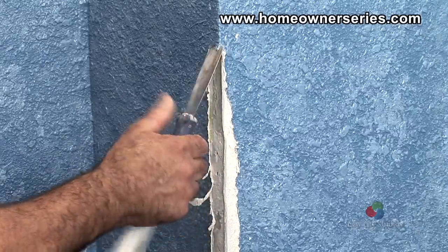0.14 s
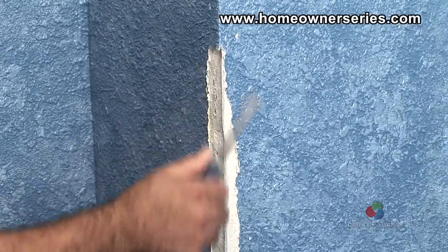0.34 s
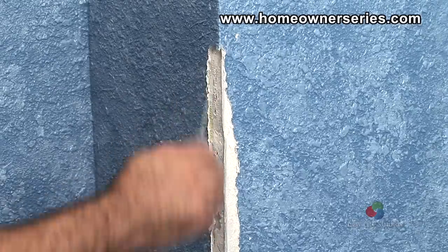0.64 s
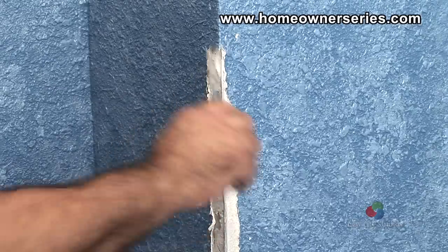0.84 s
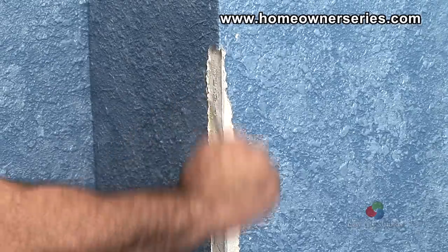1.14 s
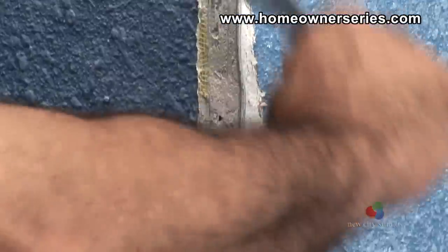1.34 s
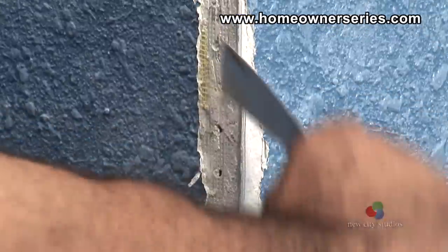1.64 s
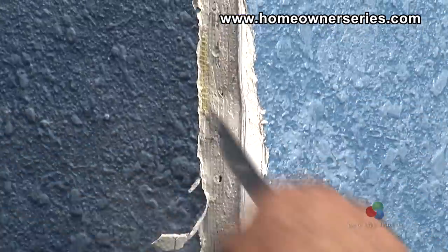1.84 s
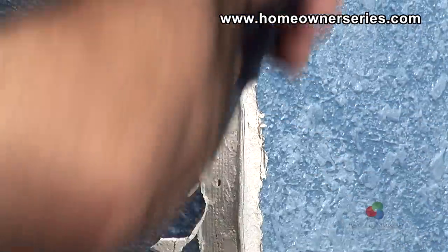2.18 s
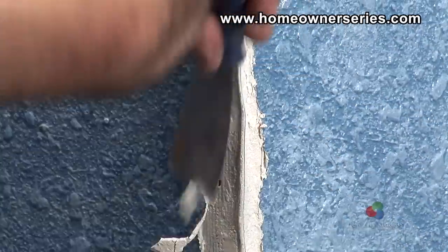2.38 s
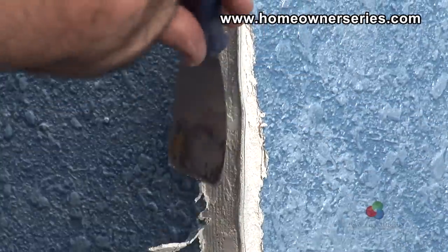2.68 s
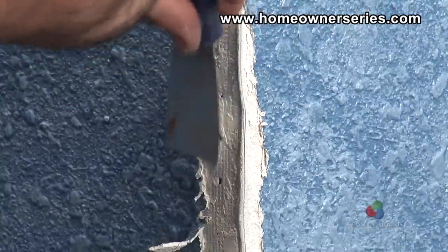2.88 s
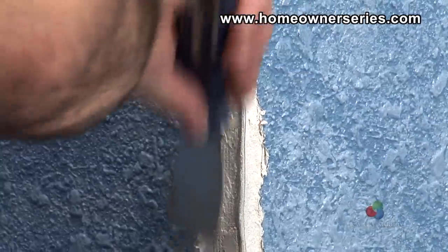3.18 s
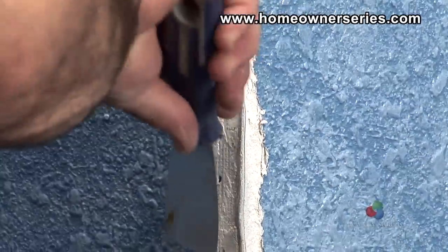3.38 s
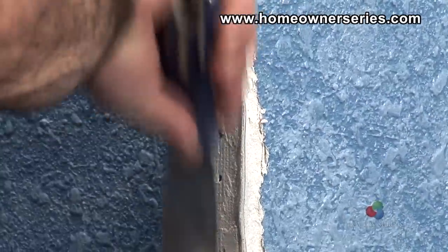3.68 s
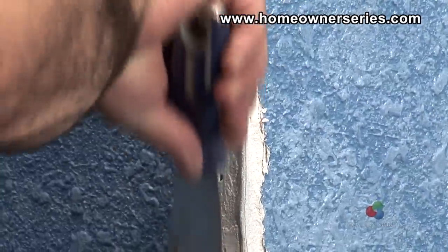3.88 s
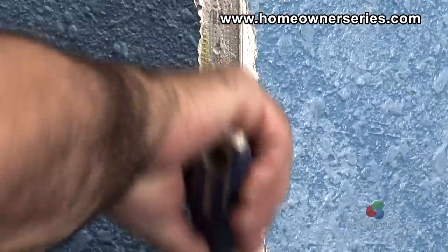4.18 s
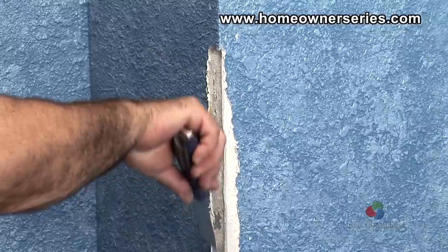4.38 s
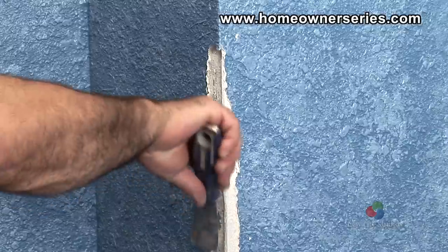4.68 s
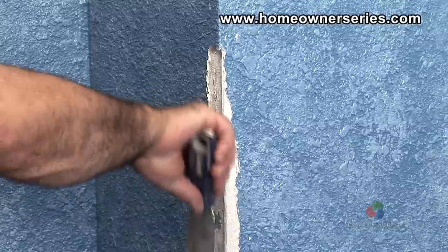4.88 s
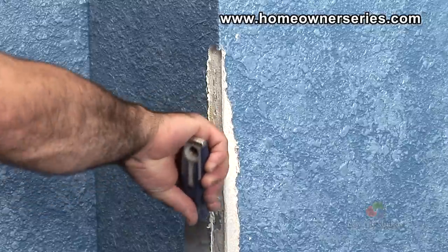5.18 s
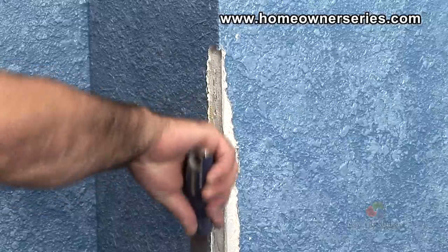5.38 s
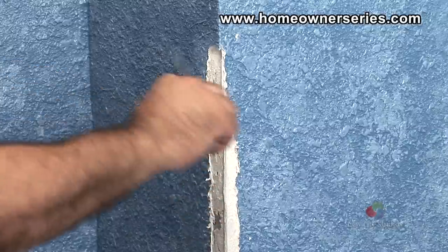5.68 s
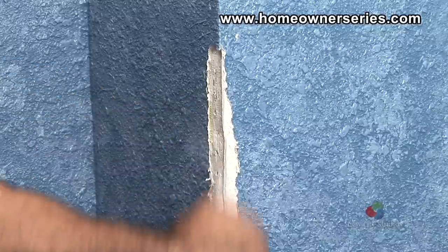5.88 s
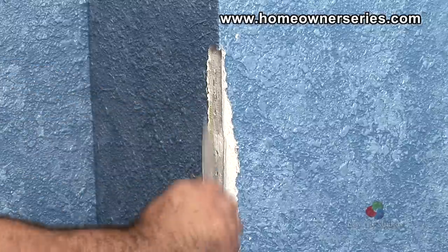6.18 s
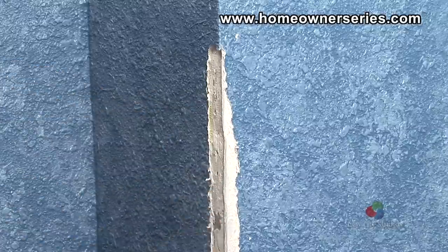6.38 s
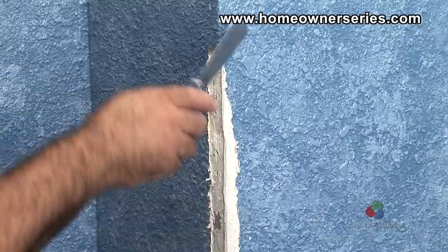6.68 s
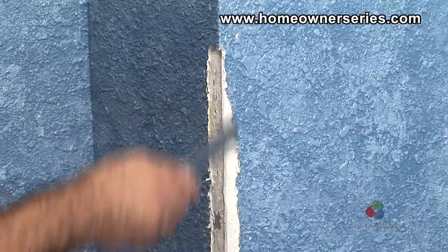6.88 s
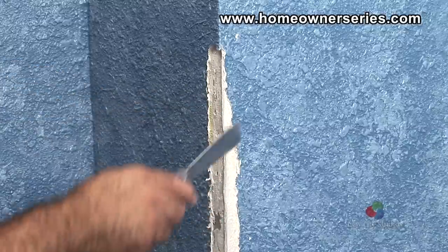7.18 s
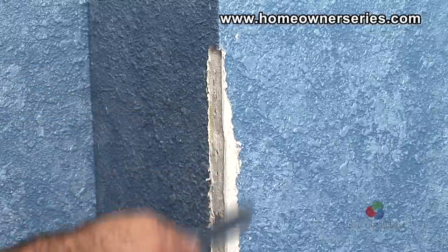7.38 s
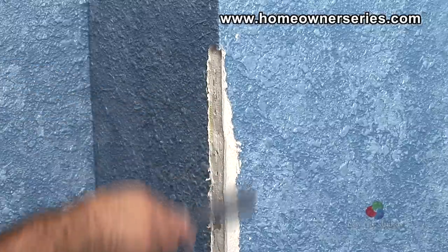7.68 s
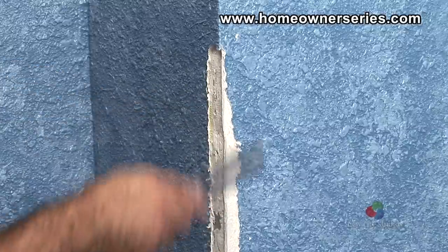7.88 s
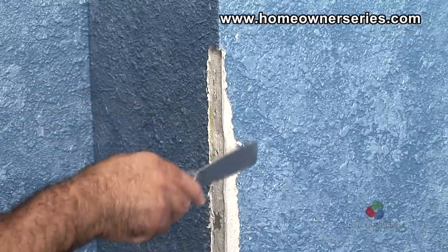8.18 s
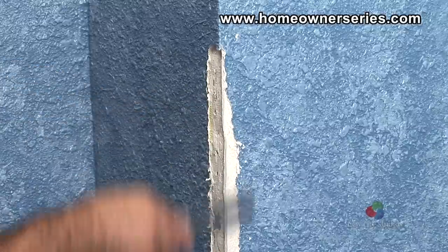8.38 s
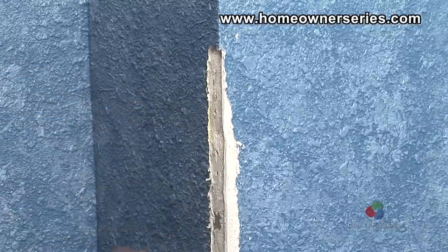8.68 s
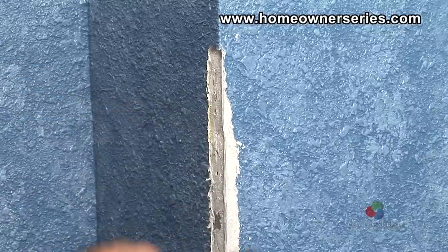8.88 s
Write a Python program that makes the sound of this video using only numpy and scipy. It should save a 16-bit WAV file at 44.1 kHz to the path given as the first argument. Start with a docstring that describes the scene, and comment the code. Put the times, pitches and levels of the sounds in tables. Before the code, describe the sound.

A steel scraping knife rasps, taps and pries along a stripped drywall corner in irregular bursts, with gritty crunches, hollow wall thuds and faint blade rings in a bare room.

```python
"""In a bare room, a steel taping knife rasps, taps and pries along a stripped drywall corner.
One rough stick-slip force rings the panel, board face, blade and steel, and crushes plaster grit.
Taps jolt the same bodies and carry short knocks; shoves thud the hollow wall, and freed steel rings.
Sparse decaying echoes let the room ring on, over a faint floor of rumble, hum and hiss."""
import sys
import numpy as np
from scipy import signal
from scipy.fft import rfft, irfft
from scipy.io import wavfile
from scipy.ndimage import uniform_filter1d

SR = 44100
rng = np.random.default_rng(int(sys.argv[2]) if len(sys.argv) > 2 else 0)


def wrap_up_sound(samples):
    """Save the sound to the file named by the first command line argument, as 16-bit audio."""
    columns = np.atleast_2d(samples).T
    # keep every value between -1 and 1, then stretch to whole-number steps
    tamed = np.clip(columns, -1, 1)
    steps = np.round(tamed * 32767).astype(np.int16)
    wavfile.write(sys.argv[1], SR, steps)


N = 398647


def gain_of(db):
    """Decibels to an amplitude factor."""
    return 10 ** (np.asarray(db) / 20)


def evened(x):
    """Scales a signal to an RMS of 1."""
    return x / np.sqrt(np.mean(x ** 2) + 1e-20)


def read(points, at):
    """Reads a spectral curve between its points, along log frequency."""
    x, value = np.transpose(points)
    return np.interp(np.log(at + 1), np.log(x + 1), value)


def curve(rows):
    """Straight-line automation through (time, value) rows, one value per sample."""
    s, value = np.transpose(rows)
    return np.interp(np.arange(N) / SR, s, value)


# Room tone and hiss: (frequency [Hz], relative density [dB per Hz])
TONE_SPECTRUM = [(32, -37.5), (55, -15.5), (93, -13), (127, 0), (150, -12), (247, -15.5), (266, -20),
                 (584, -19), (919, -24.5), (15000, -34), (16500, -50)]
# Left-right likeness of that tone: (frequency [Hz], correlation [0 to 1])
TONE_LIKENESS = [(60, 0.63), (380, 0.23), (2380, 0.09), (15000, 0.67)]
# Low rumble in the building: (time [s], level [dB])
RUMBLE_LEVEL = [(0, -48), (.68, -79), (1.31, -56), (2.16, -72.5), (2.39, -47), (2.82, -60), (3.83, -47.5),
                (4.28, -65.5), (5.11, -46.5), (5.61, -68.5), (6.8, -66), (6.97, -50.5), (7.93, -63),
                (8.06, -53.5), (9.04, -49)]
# Mains hum: (time [s], level [dB])
HUM_LEVEL = [(0, -71), (.5, -72.5), (2.3, -69.5), (3., -84.5), (9.04, -81)]
TONE_DB, HUM_HZ = -71, 120


def floor():
    """Shaped noise makes room tone and hiss; low noise makes a lumpy rumble, and a sine the hum."""
    hz = np.fft.rfftfreq(N, 1 / SR)
    a, b, low = rfft(rng.standard_normal((3, N)))
    same = np.clip(read(TONE_LIKENESS, hz), 0, 1)
    left_right = np.array([a, same * a + np.sqrt(1 - same ** 2) * b])
    tone = irfft(left_right * gain_of(read(TONE_SPECTRUM, hz)), N)
    # a hump at 35 Hz over a shelf that falls away upward
    rumble_shape = np.exp(-((hz - 35.) / 10.) ** 2) + 0.29 / (1 + (hz / 143.0) ** 2)
    rumble = irfft(np.array([0.22 * low + a, 0.085 * low + b]) * rumble_shape, N)
    hum = np.sqrt(2) * np.sin(2 * np.pi * HUM_HZ * np.arange(N) / SR)
    out = gain_of(TONE_DB) * evened(tone)
    out = out + gain_of(curve(RUMBLE_LEVEL)) * evened(rumble)
    return out + gain_of(curve(HUM_LEVEL)) * hum


def slips(per_s, spread_db, smooth):
    """Uneven stick-slip: clumped jolts, a few large, over a fine rub."""
    clumps = gain_of(2.59 * evened(uniform_filter1d(rng.standard_normal(N), 350)))
    size = gain_of(spread_db * np.minimum(rng.exponential(1, N), 4)) * rng.choice([-1., 1.], N)
    jolts = size * (rng.random(N) < per_s / SR)
    return evened(clumps * (evened(jolts) + smooth * rng.standard_normal(N)))


# Scraping strokes: (start time [s], swell [s], fade [s], peak grit drive [dB],
# entry level relative to that peak [dB], blade rasp to grit [dB], board face to grit [dB])
STROKES = [(0.0, 0.14, 0.016, -71.5, 2.5, 0.5, -1.5), (.22, 0.084, 0.033, -69.5, 9, 0, -9.5),
           (0.876, 0.088, 0.01, -60.5, -4, 5.5, 7.5), (0.967, 0.052, 0.028, -48, -5, 11, -2.5),
           (1.04, 0.032, 0.035, -50, 4, 4, -27), (1.104, 0.032, 0.016, -49.5, -22, 3, -6.5),
           (1.305, 0.043, 0.031, -43, -32, 3.5, 4), (1.374, 0.025, 0.036, -44, -4, 6, 1.5),
           (1.426, 0.029, 0.034, -42.5, -8, 4, -14.5), (1.5, 0.055, 0.062, -44, -46, 2.5, -23),
           (1.638, 0.005, 0.11, -60.5, 5, 6.5, -1), (1.677, 0.024, 0.052, -58, 7, 7, -10),
           (1.72, 0.025, 0.026, -49.5, -13, 2.5, -12), (2.217, 0.078, 0.18, -65.5, -13, 3.5, -5),
           (2.42, 0.018, 0.062, -54, -15, -3, -37), (2.49, 0.0032, 0.16, -64, -9, 0, -26),
           (2.619, 0.023, 0.06, -63, -30, 4, 6), (2.801, 0.056, 0.016, -62, -7, -1, -10),
           (2.884, 0.093, 0.052, -54, -7, 0.5, -2.5), (3.052, 0.039, .1, -60, 3, -6.5, -12),
           (3.15, 0.067, 0.025, -50, -19, -2.5, -2), (3.344, 0.011, 0.032, -59.5, -9, -7, -10),
           (3.419, 0.016, 0.027, -60.5, -8, 1, -5), (3.535, 0.067, 0.018, -60.5, -13, -1, -8),
           (3.646, 0.058, 0.14, -50, -14.5, -1, -5), (3.829, 0.041, 0.06, -59.5, -13, -1.5, -8),
           (3.948, 0.066, 0.059, -44, -19, -1, -13.5), (4.079, 0.1, 0.047, -54.5, -13.5, 1, -21),
           (4.221, 0.0078, 0.03, -50.5, -8, -4.5, -5), (4.334, 0.11, 0.014, -70, -2, -9, -7),
           (4.441, 0.091, 0.029, -53, -33, -1, -3), (4.65, 0.052, 0.22, -70, -5.5, -4, -12),
           (4.767, 0.031, 0.047, -54.5, -8, 0, 2), (4.918, 0.023, 0.066, -60.5, -5, -8.5, -29),
           (4.986, 0.021, 0.082, -53, -17, 2.5, 0), (5.353, 0.0058, 0.053, -50.5, -19, -8.5, -21.5),
           (5.76, 0.073, 0.061, -45.5, -29, 6, 7.5), (5.858, 0.045, 0.088, -41, -7.5, 0.5, -22),
           (6.23, 0.086, 0.048, -48, -1.5, -3, -3), (6.852, 0.11, 0.02, -47.5, -6.5, 3, 7),
           (7.231, 0.069, 0.072, -43, -12, 4, 6.5), (7.606, 0.18, 0.05, -60, 5, -4, -11),
           (7.837, 0.0033, 0.025, -60, -6, -5, -11), (8.006, 0.12, 0.013, -71, -11, 10, 17),
           (8.127, 0.077, .012, -83, -7, 12, 20), (8.329, 0.15, 0.0079, -49, -14, -3, -7),
           (8.648, 0.033, 0.015, -59, 2, 4, -5), (8.68, 0.027, 0.033, -48, 1, 1.5, 7),
           (8.898, 0.025, .012, -52.5, -1, -1, 7.5), (8.931, 0.0099, 0.058, -42.5, -8.5, 6.5, 8)]
LAND_S, LIFT_S = 0.0017, .007  # the edge meets the plaster and leaves it
FADE_DB, FADE_BEND = -23.5, 1.265  # how far a stroke sinks before the edge lifts, and how late


def strokes():
    """Force envelopes on board, blade and edge: each stroke lands, swells, fades and lifts."""
    gains = np.zeros((3, N + SR))
    for start, swell, fade, db, entry_db, blade_db, board_db in STROKES:
        t = np.arange(0, swell + fade + LIFT_S, 1 / SR)
        swell_db = entry_db * (1 - t / swell)
        sink_db = FADE_DB * (abs(t - swell) / fade) ** FADE_BEND
        shape_db = np.where(t < swell, swell_db, sink_db)
        touch = np.clip(np.minimum(t / LAND_S, (t[-1] - t) / LIFT_S), 0, 1)
        body_db = np.array([[board_db], [blade_db], [0]])
        gains[:, round(start * SR):][:, :len(t)] += touch * gain_of(db + shape_db + body_db)
    return gains[:, :N]


# A looser grip lets the steel sing in the stroke: (time [s], level relative to the grit [dB])
LOOSE = [(0, -17), (7.5, -8), (7.62, -3.5), (9.04, -1)]


def contact_gains(weight):
    """Stick-slip force reaching panel, board, blade, edge and loose steel."""
    board, blade, edge = strokes() + skids()
    panel = gain_of(-16.5) * weight + gain_of(-8.0) * board  # shaken by weight and by grip
    return np.array([panel, board, blade, edge, gain_of(curve(LOOSE)) * edge])


def ring(modes, shift=0.064, uneven_db=2.0, turn=0.95):
    """Response to a blow at one spot, heard at two points: each spot stirs the modes unevenly. Energy 1."""
    t = np.arange(SR // 3) / SR
    out = np.zeros((2, len(t)))
    for hz, db, t60 in modes:
        decay_db = db - 60 * t / t60 + uneven_db * rng.standard_normal((2, 1))
        phase = 2 * np.pi * hz * rng.normal(1, shift) * t + rng.normal(0, turn, (2, 1))
        out += gain_of(decay_db) / np.sqrt(t60) * np.sin(phase)
    out = out * (1 - np.exp(-t / 0.00044))
    return out / np.linalg.norm(out, axis=1, keepdims=True)


def crack(spectrum):
    """Shortest causal (minimum-phase) pulse with this spectrum. Energy 1."""
    level_db = read(spectrum, abs(np.fft.fftfreq(4096, 1 / SR)))
    log_gain = np.log(gain_of(np.maximum(level_db, -80)))
    pulse = np.fft.ifft(np.exp(np.conj(signal.hilbert(log_gain)))).real[:2048]
    return pulse / np.linalg.norm(pulse)


# Resonant modes of the panel, the board face, the pressed blade and the free steel, in that order:
# (nominal frequency [Hz], relative level [dB], t60 [s])
PANEL = [(279.4, -10.5, 0.031), (394, -1, 0.24), (463, -0.5, 0.061), (544, 0, 0.046), (652, -1.5, 0.051)]
BOARD = [(752, 1, 0.012), (1035, -4, 0.011), (1052, -9.5, 0.04), (1203, 3, 0.033), (1470, 1.5, 0.0016),
         (1788, -0.5, 0.013), (1387, 4, 0.011)]
BLADE = [(1860, -14.5, 0.01), (2260, 7, 0.023), (2395, 5, 0.009), (2638, 3, 0.01), (2860, 9, 0.013),
         (3300, -2.5, 0.012)]
STEEL = [(2027., -4, .1), (2988., 4, .5), (3350., -4, .09), (4221., -3, .1), (5281., 0, .2),
         (5650., -4, .12), (6600., -6, .1), (7400., -5, .07), (8737., -1, .25), (9900., -8, .08)]
# Crushed plaster: (frequency [Hz], relative density [dB per Hz])
GRIT = [(1940, -64.5), (3300, -3), (4900, 4), (6020, 2.5), (7340, 2.5), (10600, -6.5), (15200, -7.5),
        (16000, -55)]


def bodies():
    """Responses of panel, board face, pressed blade, grit and free steel, as stirred from one spot."""
    scatter = rng.standard_normal((2, 300)) * .18 * np.exp(-np.arange(300) / 40)  # off the corner's edges
    scatter[:, 0] = 1
    grit = signal.fftconvolve(crack(GRIT)[None], scatter, axes=1)
    grit /= np.linalg.norm(grit, axis=1, keepdims=True)
    steel = ring(STEEL, .001, 2.)
    return [ring(PANEL), ring(BOARD), ring(BLADE), grit, steel]


# Where the bent blade rings most: (time [s], frequency [Hz])
FLEX = [(0.9, 2460), (1.0, 3000), (1.05, 2540), (1.09, 2870), (1.35, 2700), (1.42, 2760), (1.47, 2500),
        (1.65, 2285), (1.75, 2670), (2.3, 2600), (2.47, 2280), (3.75, 2800), (4.0, 2700), (4.06, 2320),
        (5.84, 2670), (5.95, 2250), (6.4, 2350), (6.9, 2834), (9.04, 3230)]
HIT_HOLD_S = 0.017


def blade_pitch():
    """The bend of the blade sets the pitch; each hit pulls it to its own for a moment."""
    hz = curve(FLEX)
    for s, *_, hit_hz in HITS:
        hz[round(s * SR):][:round(HIT_HOLD_S * SR)] = hit_hz
    return hz


BLADE_GLIDE, STEEL_GLIDE = .025, .06  # RMS pitch drift under the changing grip, as a fraction
GLIDE_S, SING_T60 = .12, .07  # smoothing of the drift [s], t60 of damped steel [s]
SWAP_DB = 5  # the grip frees now one mode, now another
FOCUS_DB_PER_OCTAVE = 28.5  # blade modes away from its pitch are stirred less


def gliding(drive, modes, glide, centre_hz=None):
    """Modes whose pitch and strength drift, heard at two points with drifting phase. Energy 1 per blow."""
    at, step = np.arange(N), 500
    noise = rng.standard_normal((len(modes), 3, N // step + 2))
    smooth = uniform_filter1d(noise, round(GLIDE_S * SR / step), axis=2)
    slow = [[np.interp(at / step, np.arange(len(v)), evened(v)) for v in mode] for mode in smooth]
    share = []
    for (hz, db, _), (_, _, swap) in zip(modes, slow):
        if centre_hz is None:
            change_db = SWAP_DB * swap
        else:
            change_db = -FOCUS_DB_PER_OCTAVE * abs(np.log2(hz / centre_hz))
        share.append(gain_of(db + change_db))
    share = np.array(share)
    share /= np.linalg.norm(share, axis=0)
    out = np.zeros((2, N))
    for (hz, _, t60), part, (drift, lead, _) in zip(modes, share, slow):
        turn = np.exp(2j * np.pi * np.cumsum(hz * (1 + glide * drift)) / SR)
        r = gain_of(-60 / t60 / SR)  # decay per sample
        envelope = signal.lfilter([1], [1, -r], part * drive / turn)
        z = np.sqrt(2 * (1 - r * r)) * turn * envelope
        out += [z.imag, (z * np.exp(0.8j * lead)).imag]
    return out


# Low modes of the hollow wall: (nominal frequency [Hz], relative level [dB], t60 [s])
WALL = [(86, 0, .1), (95, -1.5, 0.1), (114, -6, 0.074), (160.4, -12, 0.042), (176.4, -4, 0.1),
        (205.3, -5.5, 0.19)]
DRAG_DB = -2.5  # relative to the board face


def dragged_wall(board):
    """The dragged edge keeps the wall rumbling through its low modes."""
    response = ring(WALL, 0.0082, 0.93, 0.85)
    return gain_of(DRAG_DB) * signal.oaconvolve(board[None], response, axes=1)[:, :N]


# Taps, catches and snapping flakes: (time [s], drive level [dB],
# board face relative to it [dB], grit relative to it [dB], pitch of the knock [Hz])
HITS = [(0.2185, -44, -11, -2, 2200), (0.2244, -43, -6, 6, 2420), (0.2927, -42.5, -23, 2, 2070),
        (0.33, -53, -18, 16, 4500), (0.361, -49.5, -29, 17.5, 4100), (0.391, -52.5, -22, 15.5, 3820),
        (0.5068, -64, -18, 21.5, 4030), (0.558, -20, -3.5, -13, 1200), (0.5619, -12, -2, -11, 1430),
        (0.578, -22, -8, -9.5, 1860), (0.8635, -36.5, 0, -0.5, 2680), (0.9886, -31.5, -3, 7, 3250),
        (1.2907, -31, -3.5, -5.5, 2640), (1.3962, -17, -22, -6, 1470), (1.6396, -37, -10, -16, 2240),
        (2.223, -42.5, -29, -26, 2900), (2.6551, -28, -1, -13, 2280), (2.8736, -42.5, -12, 10.5, 3820),
        (3.436, -34.5, -6, -1.5, 1080), (3.5257, -37, -23, 18, 2590), (3.5717, -33, -18, -2.5, 2900),
        (3.6403, -35.5, -0.5, -12, 1070), (3.6987, -43, 4.5, -9, 2290), (4.297, -41, -4.5, 11, 2040),
        (4.4584, -50, -6, -5, 2420), (5.3177, -53, -17.5, 15.5, 3880), (5.3589, -44.5, -19.5, -4, 2940),
        (5.485, -57, -12.5, 9, 4260), (5.7552, -41.5, 2, -3.5, 2620), (5.7892, -27, -1, -10, 2100),
        (5.885, -14, -30, -24, 2380), (5.903, -25, -17, -4, 2400), (5.9187, -23, -32, -15, 2860),
        (5.9363, -25.5, -27, 0, 2560), (6.2298, -22, -7.5, -15, 2150), (6.855, -37.5, -0.5, 3.5, 2735),
        (7.181, -34, -6.5, 1.5, 2953), (7.4903, -47, 5, 3, 1240), (7.6017, -30, 3, -3.5, 1480),
        (7.6172, -29, -9, 2.5, 3200), (7.7062, -45.5, -13, 18, 4000), (7.775, -29, -9.5, -3, 1220),
        (7.839, -46.5, -30, 15, 4000), (7.9966, -31, -18, 0, 1520), (8.035, -38.5, -5, 1, 2720),
        (8.0471, -34.5, 1.5, -13, 2750), (8.101, -28.5, 3.5, 6, 2620), (8.1856, -38, -13, -4, 2090),
        (8.206, -51.5, -9, 19.5, 3020), (8.266, -67, -18, 18, 4000), (8.325, -22, -32, -3, 1120),
        (8.4742, -32, -0.5, -6, 1210), (8.587, -51.5, -17, 9.5, 1250), (8.6271, -30.5, -12, 8.5, 3240),
        (8.7208, -23, 0.5, -5, 2700), (8.8837, -22, -16, -4.5, 1050), (8.993, -27, -4.5, -4, 3000)]
BLADE_HZ, BLADE_DB_PER_OCTAVE = 2000, 10  # a hit pitched below the blade stirs it less


def blows(rings):
    """Each hit is a jolt with a few quick rebounds, scaled by the peak of each body's response."""
    drive, t = np.zeros((5, N + 512)), np.arange(512)
    shape = (len(HITS), 512)
    chatter = rng.standard_normal(shape) * (rng.random(shape) < .06) * 0.22 * np.exp(-t / 150.0)
    chatter[:, 0] = 1
    peaks = np.array([abs(r).max() for r in rings])
    for (s, db, board_db, grit_db, hz), jolt in zip(HITS, chatter):
        blade_db = BLADE_DB_PER_OCTAVE * min(np.log2(hz / BLADE_HZ), 0) - 6.0
        size = gain_of(db + np.array([board_db - 15.0, board_db, blade_db, grit_db])) / peaks[:4]
        drive[:4, round(s * SR):][:, :512] += size[:, None] * jolt
    return drive[:, :N]


def knocks(t60):
    """The patch under the edge gives each hit a brief pitch of its own, a decaying sine."""
    out, t = np.zeros(N + 2000), np.arange(2000) / SR
    for s, db, *_, hz in HITS:
        decay = gain_of(db - 4.0 - 60 * t / t60) * (1 - np.exp(-t / 0.00032))
        out[round(s * SR):][:2000] += decay * np.sin(2 * np.pi * hz * t)
    return out[:N]


SCUFF_DB, SCUFF_DB_PER_S = -24.5, -1500  # start relative to the hit's grit, and decay
SCUFF_BLADE_DB, SCUFF_BOARD_DB = -3.5, -7  # relative to the scuffed grit


def skids():
    """Force envelopes on board, blade and edge: the edge skids briefly after each hit."""
    gains = np.zeros((3, N + SR))
    t = np.arange(SR // 20) / SR
    body_db = np.array([[SCUFF_BOARD_DB], [SCUFF_BLADE_DB], [0]])
    skid = np.minimum(t / LAND_S, 1) * gain_of(SCUFF_DB + SCUFF_DB_PER_S * t + body_db)
    for s, db, _, grit_db, _ in HITS:
        gains[:, round(s * SR):][:, :len(t)] += gain_of(db + grit_db) * skid
    return gains[:, :N]


# The blade springs clear of the wall and rings: (time [s], drive level [dB])
RINGS = [(0.294, -52), (1.144, -59), (3.353, -55), (5.398, -52.5), (5.959, -45), (7.181, -47), (7.619, -55),
         (7.788, -57), (8.104, -59), (8.184, -47), (8.63, -39), (8.995, -52)]


def springs(steel):
    """One impulse into the free steel each time the blade springs clear."""
    drive = np.zeros(N)
    for s, db in RINGS:
        drive[round(s * SR)] += gain_of(db) / abs(steel).max()
    return drive


# Weight thrown into the hollow wall: (time [s], drive level [dB])
PUSH = [(0.569, -58), (0.861, -38), (0.998, -39.5), (1.285, -32.5), (1.359, -41), (1.439, -41),
        (1.631, -33.5), (2.312, -37.5), (2.4, -45), (2.649, -29), (2.928, -37), (2.978, -38), (3.206, -25),
        (3.432, -26.5), (3.65, -36), (3.695, -23.5), (3.759, -54), (3.942, -39.5), (4.486, -41.5),
        (4.53, -33), (4.794, -32), (4.998, -34.5), (5.025, -27.5), (5.091, -55), (5.353, -46.5),
        (5.756, -31.5), (5.787, -33), (5.881, -33.5), (6.228, -29.5), (6.871, -49), (6.908, -31),
        (7.186, -42), (7.266, -49), (7.299, -50), (7.601, -32.5), (7.999, -39.5), (8.093, -28.5),
        (8.173, -43.5), (8.336, -44), (8.451, -45.5), (8.622, -42), (8.689, -46), (8.885, -59),
        (8.945, -40), (8.999, -34.5)]
# Tighter or boomier wall where the weight lands: (time [s], mode tilt [dB per octave])
WALL_TILT = [(0, 5), (2.1, -2.5), (2.4, -4.5), (5.4, -2.5), (5.7, 11.5), (6.4, -6), (6.8, 5), (9.04, -11)]


def thuds(rise_s=0.0076, fall_s=0.031):
    """Each shove is a short uneven force on the wall's low modes; also returns how the weight comes and goes."""
    t = np.arange(SR // 6) / SR
    shove = (1 - np.exp(-t / rise_s)) * np.exp(-t / fall_s)
    out, weight = np.zeros((2, N + SR)), np.zeros(N + SR)
    tilt = curve(WALL_TILT)
    for s, db in PUSH:
        at = round(s * SR)
        modes = [(hz, mode_db + tilt[at] * np.log2(hz), t60) for hz, mode_db, t60 in WALL]
        push = shove * rng.normal(0, 1, (1, len(t)))
        push[0, round(rise_s * SR)] += 25.  # a strong jolt stands out of the push
        thud = signal.fftconvolve(ring(modes, 0.036, 2.6, 0.68), push, axes=1)
        out[:, at:][:, :thud.shape[1]] += gain_of(db) * thud / abs(thud.mean(0)).max()
        weight[at:][:len(t)] += gain_of(db) * shove
    return out[:, :N], weight[:N]


def placed(x, lag_ms, pan_db):
    """Delays the right channel (negative: advances it) and tilts the balance."""
    late = np.clip(np.arange(N) - np.round(lag_ms * SR / 1000).astype(int), 0, N - 1)
    return np.array([x[0] * gain_of(pan_db / 2), x[1, late] / gain_of(pan_db / 2)])


# Where the knife works: (start time [s], lag of the right channel [ms], left louder by [dB])
PLACES = [(0, 0.53, 3.5), (.52, 0.57, 11.5), (2.098, 0.0042, 11), (5.6, .4, 9.5), (6.701, -0.77, 0.5)]
# The wall radiates as a whole: (lag of the right channel [ms], left louder by [dB])
WALL_PLACE = (0.5, 0.69)
SPOTS, SPOT_SAMPLES = 6, 1500  # a contact spot is drawn anew every 34 ms
WALL_CUT_HZ = 85  # the wall cannot radiate below its lowest modes
WALL_WET_DB = -1  # the wall's lows feed the room less than the edge does


def knife():
    """One rough contact force and the blows drive all bodies, from a contact spot that keeps moving."""
    wall, weight = thuds()
    rough = slips(per_s=2500., spread_db=3.5, smooth=0.55)
    panel, board, blade, edge, loose = rough * contact_gains(weight)
    wall = wall + dragged_wall(board)
    wall = signal.sosfilt(signal.butter(2, WALL_CUT_HZ, "high", fs=SR, output="sos"), wall)
    force = np.array([panel, board, blade, edge, np.zeros(N)])
    spot = np.repeat(rng.integers(0, SPOTS, N // SPOT_SAMPLES + 1), SPOT_SAMPLES)[:N]
    near, on_blade = knocks(t60=.007), np.zeros(N)
    for k in range(SPOTS):
        rings = bodies()
        drive = force + blows(rings)
        drive[4] += springs(rings[4])
        drive *= spot == k
        on_blade += drive[2]
        for i in (0, 1, 3, 4):  # the blade rings through its gliding modes instead
            near = near + signal.oaconvolve(drive[i][None], rings[i], axes=1)[:, :N]
    near = near + gliding(on_blade, BLADE, BLADE_GLIDE, blade_pitch())
    damped_steel = [(hz, db, SING_T60) for hz, db, _ in STEEL]
    near = near + gliding(loose, damped_steel, STEEL_GLIDE)
    s, lag_ms, pan_db = np.transpose(PLACES)
    now = np.searchsorted(s, np.arange(N) / SR, side="right") - 1
    direct = placed(wall, *WALL_PLACE) + placed(near, lag_ms[now], pan_db[now])
    radiated = (gain_of(WALL_WET_DB) * wall + near).mean(0)
    return direct, radiated


# How long the room rings: (frequency [Hz], t60 [s])
ROOM_DECAY = [(60, 0.28), (160, 0.88), (420, 1), (1100, 0.72), (2900, 0.75), (7700, 0.58), (16000, 0.26)]


def room(x, early_db, late_db):
    """Near surfaces give a few strong taps; then sparse taps die band by band."""
    early = np.zeros((2, 1400))
    at = rng.integers(30, 1400, (2, 14))
    np.put_along_axis(early, at, rng.choice([-1., 1.], at.shape) * np.exp(-at / 232.0), 1)
    taps = np.zeros((2, SR))
    at = np.arange(400, SR - 20, 20) + rng.integers(0, 20, (2, (SR - 401) // 20))
    np.put_along_axis(taps, at, rng.choice([-1., 1.], at.shape), 1)
    hz, t, z = signal.stft(taps, SR, nperseg=256)
    decay = gain_of(-60 * t / read(ROOM_DECAY, hz)[:, None])
    tail = signal.istft(z * decay, SR, nperseg=256)[1]
    tail *= gain_of(late_db) / np.linalg.norm(tail[0])
    tail[:, :1400] += gain_of(early_db) * early / np.linalg.norm(early, axis=1, keepdims=True)
    # both sides are fed the same signal, whatever side the source is on
    return signal.fftconvolve(x[None], tail, axes=1)[:, :N]


def scene():
    """Mixes the direct knife and wall, their room sound and the floor."""
    direct, radiated = knife()
    return gain_of(0.5) * direct + room(radiated, early_db=0.5, late_db=-7.5) + floor()


TREBLE_LIMIT_HZ = 16000


def record(dry):
    """The microphone loses the deepest bass; then a low-pass limits the treble."""
    thinned = signal.sosfilt(signal.butter(2, 28, "high", fs=SR, output="sos"), dry)
    low_pass = signal.firwin(201, TREBLE_LIMIT_HZ, window=("kaiser", 10), fs=SR)
    return signal.oaconvolve(thinned, low_pass[None], "same")


dry = scene()
out = record(dry)
wrap_up_sound(out)
```